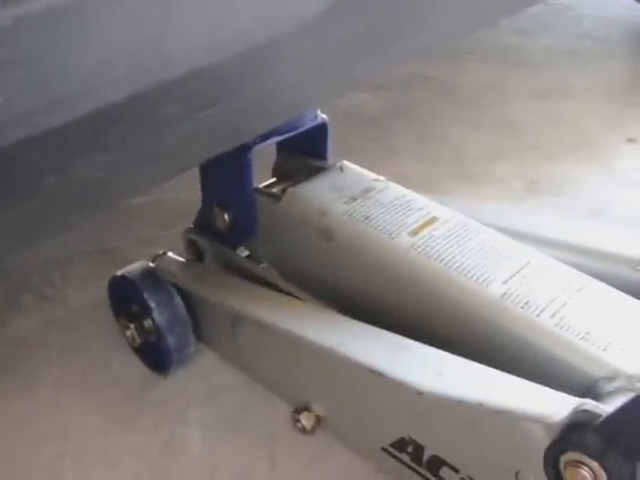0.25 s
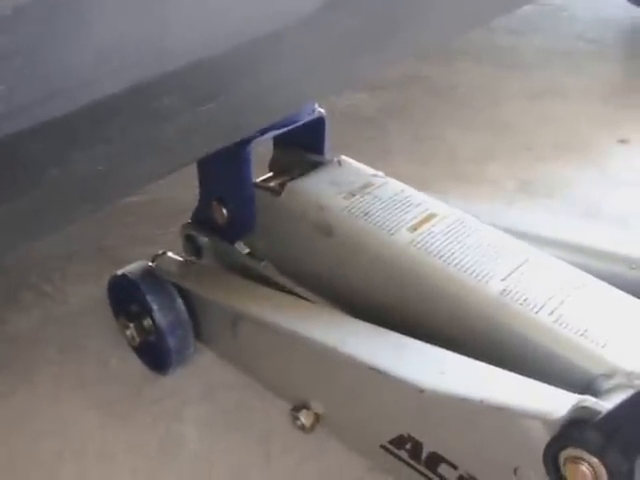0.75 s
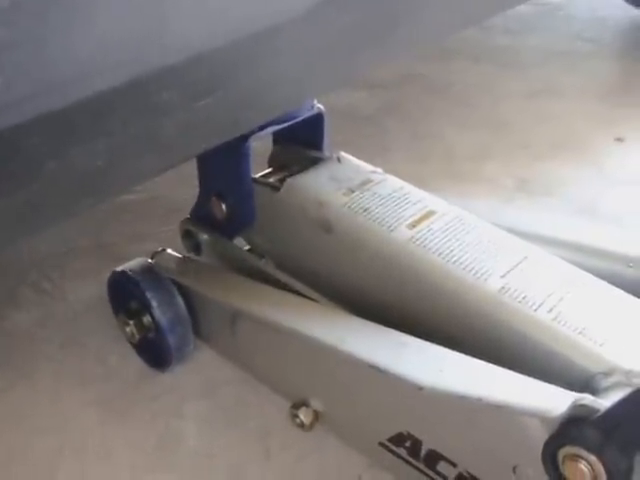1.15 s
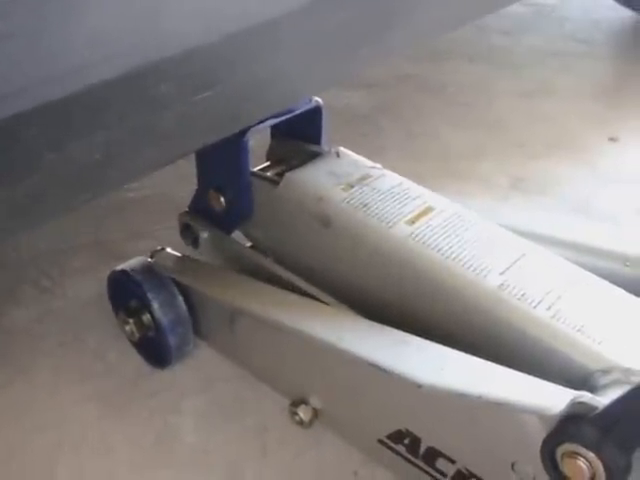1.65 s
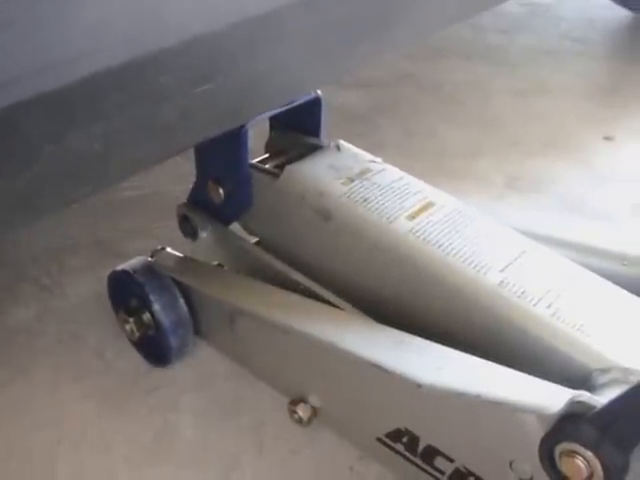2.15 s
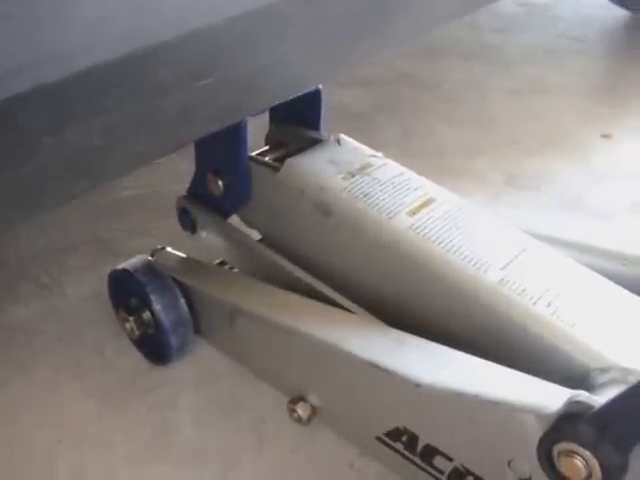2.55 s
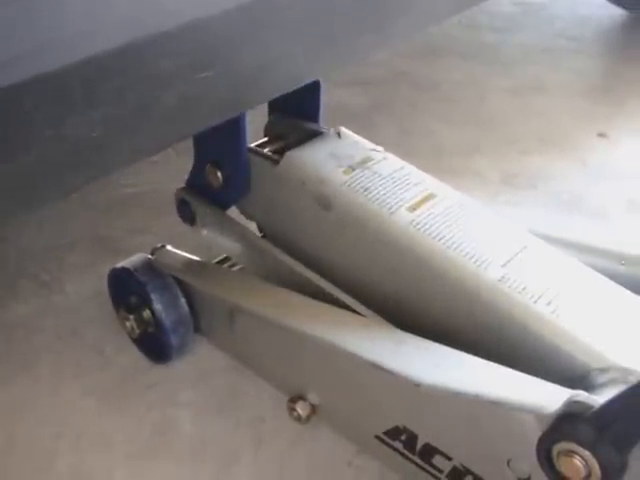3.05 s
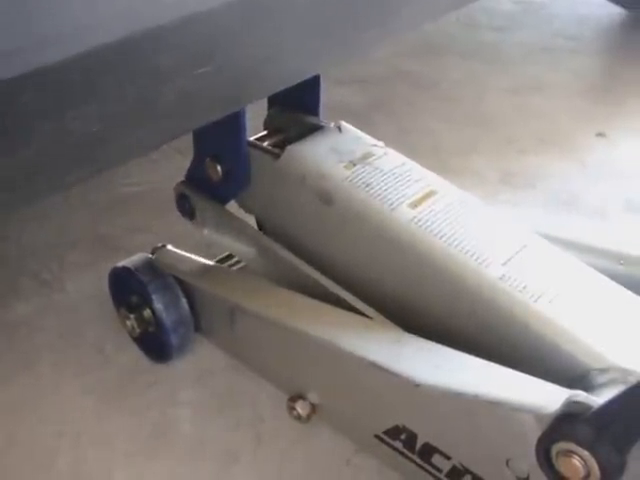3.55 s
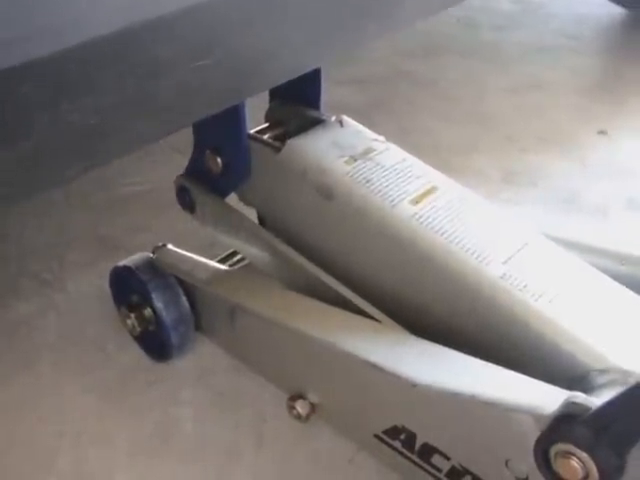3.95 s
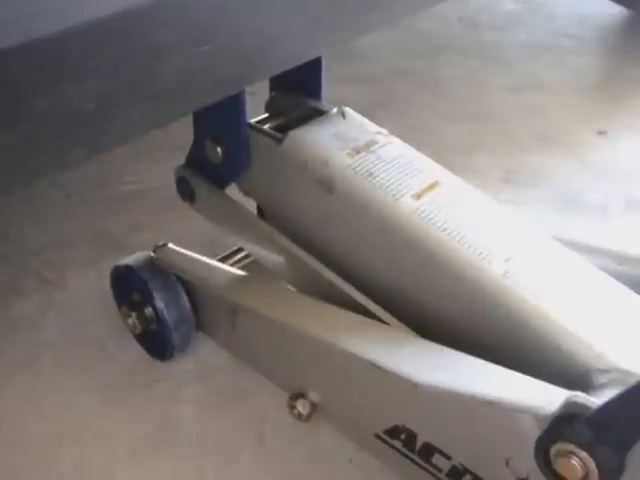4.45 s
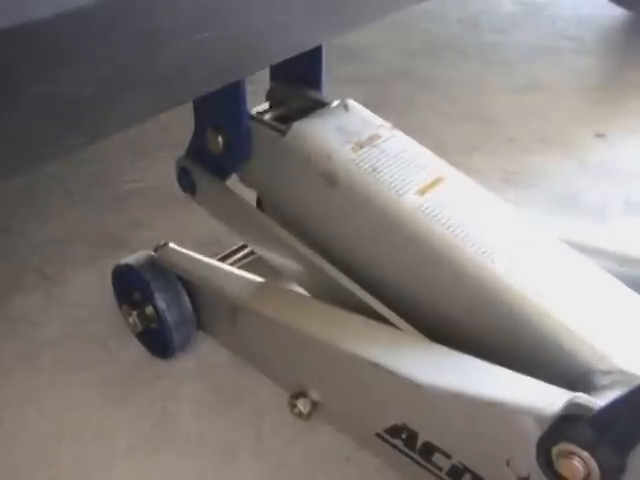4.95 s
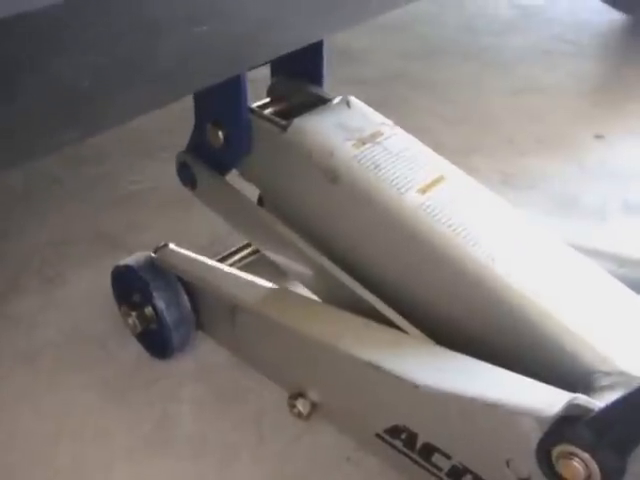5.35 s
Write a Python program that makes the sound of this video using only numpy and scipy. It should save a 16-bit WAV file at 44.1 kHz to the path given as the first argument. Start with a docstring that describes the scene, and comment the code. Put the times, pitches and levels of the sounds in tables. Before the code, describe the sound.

A hydraulic floor jack is pumped quickly beneath a car in a concrete garage, heard from close by. From the first instant, loose steel parts clack and chatter unevenly, with a strong cluster at 0.2-0.6 s. Each knock is dry, bright and very short, with a small hollow boom from the frame and a dull low pop. Strokes come about twice a second; from about 1.35 s most end in a harder, briefly ringing clank, near 1.9, 2.4, 2.9, 3.35, 3.9, 4.3, 4.7 and 5.5 s. Between them, pivots rub with a grainy scrape and small parts tick. Tiny rough squeaks occur near 0.7, 1.7, 3.1 and 3.7 s, some barely audible. The rattling grows denser and firmer from about 4 s, with heavy knocks near 4.6-4.7, 5.1 and 5.45 s. Short, shifting echoes surround it over a faint, low, steady room hum, and the pumping continues to the end.

```python
"""A garage: a hydraulic floor jack is pumped in quick strokes, about two a second, under a car.
Loose handle and linkage clack and chatter (random contacts, filtered); the frame booms after each knock
and rings; most strokes end in a clank of the handle socket (decaying modes). Pivots rub as filtered
grains, small parts tick, dry pins squeak as rough glides. Dull pops go with the clacks.
The concrete room answers with brief, shifting echoes over a steady background."""
import sys
import numpy as np
from scipy import signal
from scipy.io import wavfile
from scipy.ndimage import uniform_filter1d, minimum_filter1d

SR = 44100
rng = np.random.default_rng(int(sys.argv[2]) if len(sys.argv) > 2 else 0)


def unload_wav(signal):
    """Save mono or channel-first audio to the path in sys.argv[1] as 16-bit WAV at rate SR, clipped to [-1, 1]."""
    wavfile.write(
        sys.argv[1],
        SR,
        np.round(np.clip(np.atleast_2d(signal).T, -1, 1) * 32767).astype(np.int16),
    )


N = 246519

# Clacks of the loose linkage. Each row: start in seconds, relative strength in dB, chatter length in seconds,
# relative treble in dB, clink in Hz, relative frame boom in dB, boom resonance in Hz.
CLACKS = [(0.004, -14, 0.03, 5, 3020, -27.5, 477), (0.205, -14.5, 0.022, -1.5, 2220, -48, 480),
          (0.225, -7, 0.018, -3.5, 2190, -29.5, 480), (0.253, -4.5, 0.03, -4.5, 3020, -22.5, 363),
          (0.398, -6, 0.017, -0.5, 1600, -25, 270), (0.458, -19.5, 0.016, -12, 1550, -35, 259),
          (0.551, -7, 0.012, -6, 5340, -30, 458), (0.565, -0.5, 0.013, -0.5, 5250, -45, 408),
          (0.627, -15, 0.061, 0.5, 5860, -34, 459), (0.785, -11, 0.046, -1, 2200, -32.5, 390),
          (0.825, -6, 0.031, -3, 2960, -28, 448), (0.97, -11.5, 0.014, -1.5, 1650, -30.5, 326),
          (1.063, -10.5, 0.014, 1.5, 5400, -40, 680), (1.155, -8.5, 0.0064, -4, 3500, -37, 483),
          (1.17, -21, 0.046, 3, 3520, -42, 516), (1.305, -11, 0.045, 0, 3430, -29, 542),
          (1.46, -12, 0.023, -2, 1670, -26.5, 331), (1.639, -18, 0.066, 3, 3030, -37.5, 525),
          (1.8, -10.5, .02, -1.5, 3970, -38, 461), (1.824, -17, 0.031, 2, 1290, -34, 512),
          (2.044, -12.5, .015, -3.5, 925, -29, 339), (2.104, -15.5, 0.013, -3.5, 785, -40, 270),
          (2.132, -19.5, 0.014, 0, 1760, -57, 463), (2.193, -11.5, 0.043, -1.5, 2190, -29, 500),
          (2.275, -9, 0.0095, -12, 3330, -48, 710), (2.29, -7.5, 0.01, -10.5, 5300, -31.5, 502),
          (2.326, -7.5, 0.032, 1, 3420, -35.5, 360), (2.532, -8, .024, -1.5, 1590, -30, 402),
          (2.548, -6, 0.019, -18, 3200, -24, 377), (2.583, -6, 0.02, -14.5, 1425, -27, 392),
          (2.612, -12.5, 0.019, -10, 1500, -40, 380), (2.688, -14.5, 0.041, 0.5, 2120, -34.5, 495),
          (2.739, -12, 0.028, -17, 2090, -32.5, 371), (2.777, -3.5, 0.012, -3, 4940, -30, 476),
          (2.812, -9.5, 0.032, 0.5, 3560, -28.5, 506), (2.99, -9, 0.028, -5, 1940, -26.5, 441),
          (3.049, -14.5, .009, -14, 2200, -31, 394), (3.09, -12, 0.015, -14, 1340, -41, 410),
          (3.162, -7, 0.018, -4, 2160, -34.5, 715), (3.222, -10.5, 0.023, 0, 1420, -41, 532),
          (3.271, -9, 0.029, 2, 3140, -31.5, 532), (3.296, -9, .034, 2, 3120, -49, 480),
          (3.57, -7.5, 0.041, -3.5, 1394, -33, 453), (3.669, -11, 0.021, -2.5, 2140, -33, 539),
          (3.81, -10, .024, -3, 2300, -32, 386), (3.833, -12.5, 0.021, 0.5, 2370, -27.5, 376),
          (3.967, -16, 0.031, -6.5, 4000, -39.5, 588), (4.028, -12.5, 0.047, 2.5, 780, -30.5, 686),
          (4.095, -8.5, 0.026, -3, 2110, -30, 467), (4.16, -14, 0.021, -7, 800, -39, 607),
          (4.19, -4, .016, -2, 3110, -35, 396), (4.213, -13, 0.0075, -5, 3800, -41, 403),
          (4.256, -8, 0.015, -4, 1420, -35, 395), (4.3, -12, 0.0085, -5.5, 2980, -40, 400),
          (4.417, -17.5, 0.025, -14.5, 970, -37, 617), (4.458, -13, 0.06, 1.5, 3590, -33.5, 467),
          (4.539, -12.5, .023, -6.5, 800, -31, 453), (4.595, -11, .02, 1.5, 2260, -43, 430),
          (4.612, -2.5, 0.0068, -15, 2180, -35, 410), (4.677, -6, 0.021, -0.5, 2360, -45, 410),
          (4.7, -3.5, .015, -31, 2970, -25.5, 410), (4.813, -6, 0.017, -4, 2230, -24.5, 286),
          (4.858, -8.5, 0.038, -2, 840, -34, 713), (4.91, -17.5, 0.025, -1.5, 2270, -41.5, 710),
          (4.937, -11, 0.025, 0.5, 2230, -35.5, 583), (5.017, -8, 0.0097, -5, 3370, -50, 400),
          (5.025, -4, .016, -3, 3460, -33, 387), (5.052, -12, 0.025, -0.5, 860, -39, 330),
          (5.091, -3, 0.031, -3, 2100, -26, 444), (5.229, -13.5, 0.015, -2.5, 1590, -30.5, 385),
          (5.243, -12.5, 0.031, -13.5, 6600, -40, 690), (5.279, -9.5, 0.035, -2, 2240, -33.5, 707),
          (5.356, -15.5, 0.028, -4, 4250, -36.5, 674), (5.41, -11, 0.0074, -4.5, 2330, -42, 410),
          (5.449, -2, 0.027, -2.5, 2200, -27.5, 403), (5.557, -10, .01, -7, 1410, -36.5, 382)]
# Spectrum of steel clacking. Each row: frequency in Hz, gain in dB.
CLACK_COLOUR = [(100, -11.5), (300, -23.5), (700, -8.5), (1080, -4.5), (1400, 0), (2300, 2), (3300, -0.5),
                (4600, 0.5), (5600, 5), (7000, 2), (8300, -2.5), (9900, -1), (12000, -58.5)]


def amp(db):
    """Amplitude factor of a level in dB."""
    return 10 ** (np.asarray(db) / 20)


def unit(x):
    """Scale to an RMS of 1."""
    return x / np.sqrt(np.mean(x ** 2) + 1e-20)


def read(points, hz):
    """Interpolate a table of (Hz, value) on a log-frequency axis."""
    point_hz, value = np.transpose(points)
    return np.interp(np.log(hz + 1), np.log(point_hz + 1), value)


def hump(hz, centre_hz, octaves):
    """Bell of height 1 on a log-frequency axis."""
    return 1 / (1 + (np.log2((hz + 1) / centre_hz) / octaves) ** 2)


def add(mix, start_s, sound):
    """Add a sound in place, cut at the end of the mix."""
    part = mix[max(round(start_s * SR), 0):][:len(sound)]
    part += sound[:len(part)]


def colour(x, db_at, size=2048):
    """Causal minimum-phase filter whose gain in dB is the function db_at of frequency."""
    hz = abs(np.fft.fftfreq(size, 1 / SR))
    log_gain = np.log(amp(db_at(hz)))
    taps = np.fft.ifft(np.exp(np.conj(signal.hilbert(log_gain)))).real
    return signal.fftconvolve(x, taps[:size // 2])[:len(x)]


def ring(modes, t, scatter_cycles=0):
    """Dying sines, one per mode (Hz, dB, t60 in s), starting at phases up to scatter_cycles apart."""
    out = 0
    for hz, db, t60_s in modes:
        phase_cycles = hz * t + scatter_cycles * rng.random()
        out = out + amp(db - 60 * t / t60_s) * np.sin(2 * np.pi * phase_cycles)
    return out


def uneven_spots(count, spread_db):
    """Random gains in dB at log-spaced frequencies: the uneven colour of one spot of the steel."""
    return np.column_stack([np.geomspace(500, 11000, count), spread_db * rng.standard_normal(count)])


def chatter(t, length_s, contacts_per_s=2200, grit=0.81, rise_s=0.00095, clump_db=3.04,
            stop_power=1.99, snap=0.67, snap_s=0.0039):
    """Steel bouncing on steel: a firm first contact, then clumps of tiny ones that stop as the parts seat."""
    contacts = rng.choice([-1., 1.], len(t)) * (rng.random(len(t)) < contacts_per_s / SR)
    clumps = amp(clump_db * unit(uniform_filter1d(rng.standard_normal(len(t)), size=110)))
    seating = np.exp(-(t / max(length_s, .002)) ** stop_power)
    fade = (1 - np.exp(-t / rise_s)) * (seating + snap * np.exp(-t / snap_s))
    burst = (unit(contacts) + grit * rng.standard_normal(len(t))) * clumps * fade
    return burst * np.linalg.norm(fade) / np.linalg.norm(burst)


def air(level_db=-51):
    """Steady background of the garage: filtered noise."""
    # Each row: frequency in Hz, gain in dB.
    air_colour = [(25, -10), (60, -2.5), (100, -9), (145, 18), (200, 0), (400, 3), (1000, -1.5),
                  (3000, -19), (10000, -43.5)]
    noise = colour(rng.standard_normal(N), lambda hz: read(air_colour, hz), size=8192)
    return amp(level_db) * unit(noise)


def rubbing_db(s, turn_db=-9):
    """The pivots slide fastest in the middle of each swing and slow towards its ends, by turn_db."""
    # Swings of the handle, each lasting until the next. Each row: start in seconds, relative rubbing level in dB.
    swings = [(0, -41.5), (0.19, -37), (0.54, -38), (0.95, -36.5), (1.29, -31.5), (1.619, -34),
              (2.029, -34.5), (2.521, -29.5), (2.97, -32), (3.54, -34.5), (4.0, -32.5), (4.42, -35.5),
              (4.8, -32.5), (5.21, -34.5)]
    starts_s, levels_db = np.transpose(swings)
    place = np.interp(s, np.append(starts_s, N / SR + 0.08), np.arange(len(starts_s) + 1))
    from_middle = 2 * (place % 1) - 1
    return levels_db[place.astype(int)] + turn_db * from_middle ** 2


def pivots(level_db=-1, grain_db=-1.0, grains_per_s=2500, stick_db=3.5, noise=4.3):
    """Dry pins stick and slip under load: fine grains of uneven size, in clumps."""
    # Spectrum of the rubbing. Each row: frequency in Hz, gain in dB.
    rub_colour = [(100, -1.5), (430, -3.5), (1000, 12.5), (2100, 17), (3200, 13), (5000, 4.5),
                  (10000, -45.5)]
    sizes = amp(grain_db * np.minimum(rng.exponential(1, N), 3))
    grains = rng.standard_normal(N) * (rng.random(N) < grains_per_s / SR) * sizes
    slips = amp(stick_db * unit(uniform_filter1d(rng.standard_normal(N), size=400)))
    rough = (unit(grains) + noise * rng.standard_normal(N)) * slips
    rub = colour(rough, lambda hz: read(rub_colour, hz))
    return unit(rub) * amp(level_db + rubbing_db(np.arange(N) / SR))


def clack(t, length_s, clang_db, treble_db, clink_hz, spot_db=3.0, clink_db=9.0, clink_octaves=0.073,
          rocks_per_s=42, build_share=0.07, rebound_after=0.9, rebound_db=-14, rebound_s=0.021):
    """A part hits, falls back once and rocks between two spots of uneven colour around one clink."""
    tilt = [(450, 0.0024), (800, clang_db), (1300, clang_db), (1700, 0.018), (3700, 0.028), (5000, treble_db)]
    contacts = chatter(t, length_s) * (1 - np.exp(-t / (build_share * length_s)))  # long clacks build slowly
    # the rebound comes after a share of the chatter length
    add(contacts, rebound_after * length_s, amp(rebound_db) * chatter(t, rebound_s))
    lean, out = np.cos(np.pi * rocks_per_s * t) ** 2, 0
    for share in (lean, 1 - lean):
        spot = uneven_spots(44, spot_db)

        def gain_db(hz):
            steel_db = read(CLACK_COLOUR, hz) + read(tilt, hz) + read(spot, hz)
            return steel_db + clink_db * hump(hz, clink_hz, clink_octaves)

        out = out + colour(contacts * share, gain_db, size=1024)
    return out


def boom(t, boom_hz=406.0, rise_s=0.016, peak_db=6.0, octaves=0.12, tone_db=-4.5):
    """The long side plates take a moment to swing up after a knock, one resonance leading."""
    # Each row: frequency in Hz, gain in dB before the resonance peak.
    boom_colour = [(60, -26), (120, -11), (200, -2), (270, 0), (315, -4), (380, 2), (520, 1), (650, -3),
                   (830, -4), (1050, -14), (2500, -35)]
    swell = t / rise_s * np.exp(1 - t / rise_s)
    noise = rng.standard_normal(2 * len(t))
    crowd = colour(noise, lambda hz: read(boom_colour, hz) + peak_db * hump(hz, boom_hz, octaves))
    leading = amp(tone_db) * np.sin(2 * np.pi * (boom_hz * t + rng.random()))
    swing = (unit(crowd[len(t):]) + leading) * swell  # first half dropped: filter run-in
    return swing * np.linalg.norm(swell) / np.linalg.norm(swing)


def linkage(level_db=-2.0, boom_db=-2.5, clang_db=2.0, treble_db=-4.0, clang_from_db=-32.5, clang_per_db=0.24):
    """Slack is taken up: a clack and a boom; knocks that swing the side plates harder also clang more."""
    out, t = np.zeros(N), np.arange(SR // 8) / SR
    for start_s, db, length_s, high_db, clink_hz, frame_db, boom_hz in CLACKS:
        low_db = clang_db + clang_per_db * (frame_db - clang_from_db)
        hit = clack(t, length_s, low_db, high_db + treble_db, clink_hz)
        add(out, start_s, amp(db + level_db) * hit)
        add(out, start_s, amp(boom_db + frame_db) * boom(t, boom_hz))
    return out


def pops(level_db=-30.0, fall_s=0.00059, release_s=0.0064, lowest_hz=2.7, full_length_s=0.04,
         hold_share=0.33, per_treble_db=1.0):
    """A dull low pop with each clack, most with long bright ones: a pressure dip that holds and lets go."""
    out, t = np.zeros(N), np.arange(SR // 10) / SR
    for start_s, _, length_s, high_db, *_ in CLACKS:
        since_hold_s = np.maximum(t - hold_share * length_s + release_s / 2, 0)
        held = np.exp(-since_hold_s / release_s)
        depth = amp(level_db + per_treble_db * high_db) * min(length_s / full_length_s, 1)
        add(out, start_s, -depth * (1 - np.exp(-t / fall_s)) * held)
    return signal.sosfilt(signal.butter(1, lowest_hz, "high", fs=SR, output="sos"), out)


def ticks(level_db=7.0, busy_per_s=30, busy_db=-34, spread_db=1.0, length_s=0.0032, spot_db=9.0):
    """Washers and pins jump in their play, harder and more often while the pivots slide."""
    # Light ticks are duller than clacks. Each row: frequency in Hz, gain in dB.
    tick_tilt = [(2200, 0.5), (5000, -7.5)]
    out, t = np.zeros(N), np.arange(SR // 40) / SR
    rate_per_s = busy_per_s * amp(rubbing_db(np.arange(N) / SR) - busy_db)  # busy_per_s at busy_db of rubbing
    for start_s in np.flatnonzero(rng.random(N) < rate_per_s / SR) / SR:
        spot = uneven_spots(20, spot_db)
        tick = colour(chatter(t, length_s),
                      lambda hz: read(CLACK_COLOUR, hz) + read(tick_tilt, hz) + read(spot, hz), size=512)
        tick_db = level_db + rubbing_db(start_s) + spread_db * rng.standard_normal()
        add(out, start_s, amp(tick_db) * tick)
    return out


def frame(x, ring_db=-15):
    """Everything passed in also sets the modes of the steel frame ringing, by convolution."""
    # Each row: frequency in Hz, relative level in dB, t60 in seconds.
    frame_modes = [(270.4, -4.5, 0.18), (359, -2, 0.029), (522, -4, 0.061), (820, -22.5, 0.058),
                   (933, 17.5, 0.0083), (1279, 3.5, 0.072), (1980, -3.5, 0.31), (2840, -35, 0.086),
                   (3360, 13, 0.03), (3840, -15, 0.05), (5310, 5, 0.044), (9060, -10.5, 0.026)]
    response = ring(frame_modes, np.arange(SR // 3) / SR)
    return x + amp(ring_db) * signal.fftconvolve(x, response / np.linalg.norm(response))[:N]


def squeaks(waver=0.096):
    """A dry pin slips so fast that its slips merge into a rough gliding tone."""
    # Each row: start in seconds, length in seconds, start in Hz, end in Hz, level in dB.
    squeak_rows = [(0.728, 0.072, 5000, 4500, -36), (1.738, 0.017, 1656, 1870, -19.5),
                   (3.064, 0.02, 1363, 1480, -18), (3.737, 0.053, 4900, 4340, -40)]
    out = np.zeros(N)
    for start_s, length_s, start_hz, end_hz, db in squeak_rows:
        n = round(length_s * SR)
        roughness = unit(uniform_filter1d(rng.standard_normal(n), size=40))
        hz = np.linspace(start_hz, end_hz, n) * (1 + waver * roughness)
        tone = np.sin(2 * np.pi * np.cumsum(hz) / SR)
        add(out, start_s, amp(db) * signal.windows.tukey(n, .5) * tone)
    return out


def socket(ring_db=0., crack_db=7.5, boom_db=-3.0, length_s=0.017):
    """The stroke ends on a hard stop: a crack, a boom, and the modes of the handle socket ring."""
    # Each row: start in seconds, relative strength in dB, relative frame boom in dB.
    clanks = [(1.354, -15.5, -23.5), (1.863, -17, -31), (2.384, -13.5, -22.5), (2.863, -11, -24.5),
              (3.351, -14, -29.5), (3.8614, -15, -26.5), (4.264, -14.5, -26.5), (4.6881, -9, -35),
              (5.4995, -15.5, -31.5)]
    # Modes of the socket. Each row: frequency in Hz, relative level in dB, t60 in seconds.
    socket_modes = [(1370, -14, 0.028), (1410, -3, 0.041), (1610, -8, 0.015), (1970, 2.5, 0.06),
                    (2004, 3, 0.15), (2085, 1, 0.031), (2090, 0, 0.021), (2302, 0.5, 0.064),
                    (3340, -24.5, .06)]
    # Spectrum of the crack. Each row: frequency in Hz, gain in dB.
    clank_colour = [(100, -23), (400, -5), (900, -10.5), (1400, 8), (2200, -4.5), (3000, -2.5), (5000, -11),
                    (10000, -19)]
    out, t = np.zeros(N), np.arange(SR // 3) / SR
    for start_s, db, frame_db in clanks:
        crack = colour(chatter(t, length_s), lambda hz: read(clank_colour, hz))
        ringing = ring(socket_modes, t, scatter_cycles=1)
        add(out, start_s, amp(db) * (amp(ring_db) * ringing + amp(crack_db) * crack))
        add(out, start_s, amp(frame_db + boom_db) * boom(t))
    return out


def reflections(onset_s=0.013, echoes_per_s=3000):
    """Echoes off floor, car and walls; each band dies at its own speed."""
    # Each row: frequency in Hz, t60 in seconds.
    garage_t60 = [(150, 0.4), (400, 0.66), (1000, 0.43), (2800, 0.32), (7300, 0.32)]
    taps = rng.choice([-1., 1.], SR // 2) * (rng.random(SR // 2) < echoes_per_s / SR)
    hz, t, bands = signal.stft(taps, SR, nperseg=256)
    decay = amp(-60 * t / read(garage_t60, hz)[:, None])
    tail = signal.istft(bands * decay, SR, nperseg=256)[1]
    tail = tail * (1 - np.exp(-np.arange(len(tail)) / SR / onset_s))
    return tail / np.linalg.norm(tail)


def garage(x, wet_db=-14.5, shift_per_s=2.345, count=3):
    """Knocks come from different ends of the jack, so the pattern of echoes keeps shifting."""
    turn = shift_per_s * np.arange(N) / SR
    wet = 0
    for k in range(count):
        share = np.cos(np.pi * (turn + k / count)) * np.sqrt(2 / count)
        wet = wet + signal.fftconvolve(x * share, reflections())[:N]
    return x + amp(wet_db) * wet


def scene():
    """The jack in the room, plus pops and background without echoes."""
    jack = frame(linkage() + pivots() + ticks()) + socket() + squeaks()
    return (garage(jack) + pops() + air())[None]


def record(dry, knee_db=-7.0, recover_db_per_s=904.0, squeeze=.6, edge_hz=10150):
    """A fast limiter takes off a share (squeeze) of the dB above the knee; then a low-pass at edge_hz."""
    peak_db = -minimum_filter1d(-20 * np.log10(abs(dry[0]) + 1e-9), size=60)
    fall_db = np.arange(N) * recover_db_per_s / SR
    envelope_db = np.maximum.accumulate(peak_db + fall_db) - fall_db  # instant rise, linear fall in dB
    over_db = np.maximum(envelope_db - knee_db, 0)
    held = dry / amp(squeeze * uniform_filter1d(over_db, size=40))
    low_pass = signal.firwin(301, edge_hz, window=("kaiser", 6), fs=SR)
    return signal.oaconvolve(held, low_pass[None], "same")


dry = scene()
out = record(dry)
unload_wav(out)
```